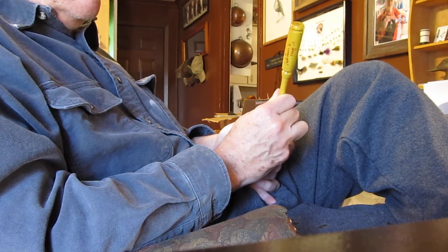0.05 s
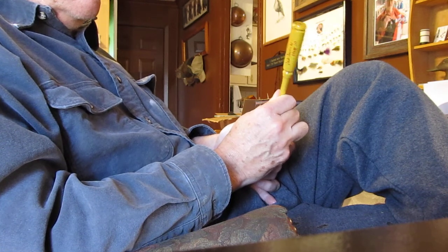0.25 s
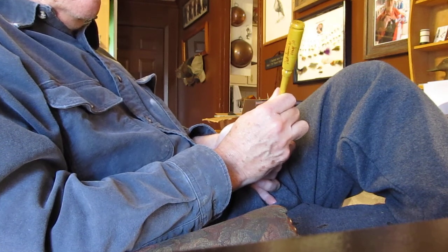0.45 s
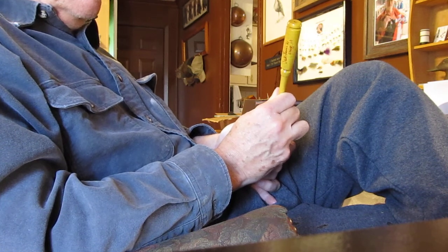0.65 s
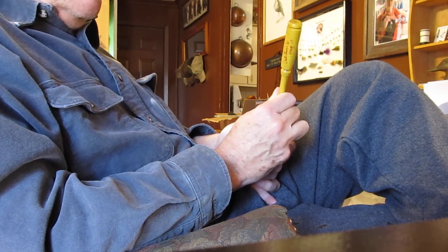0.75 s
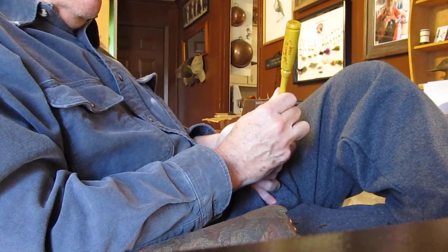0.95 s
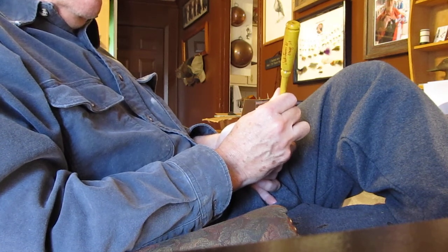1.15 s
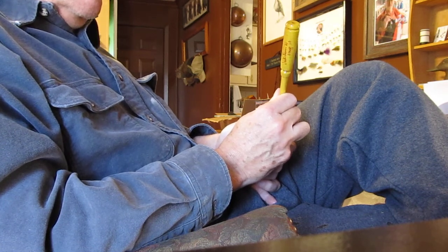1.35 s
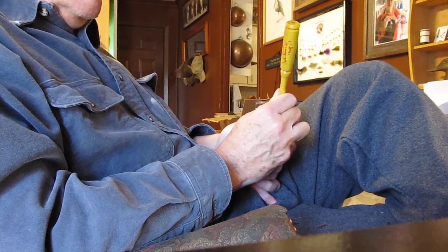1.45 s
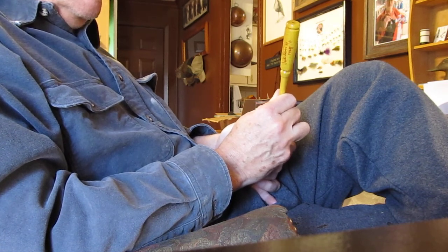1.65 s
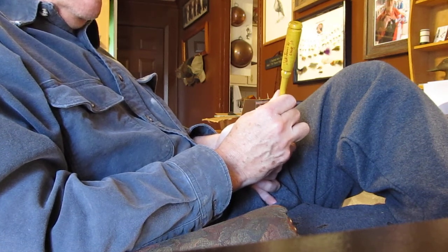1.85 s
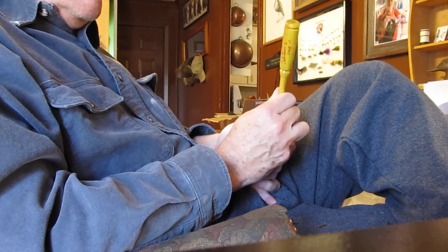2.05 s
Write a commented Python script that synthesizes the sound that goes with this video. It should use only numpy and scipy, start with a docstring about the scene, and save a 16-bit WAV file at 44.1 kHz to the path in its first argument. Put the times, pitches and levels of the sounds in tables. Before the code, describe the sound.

A friction turkey call gives one sharp cluck, then a stuttering, swelling purr in a quiet room.

```python
"""Heard first are the dying, fluttering partials of an earlier note over low rumble, hum and hiss.
Then a striker is worked on a friction pot call in a small quiet room: a light tap, one sharp cluck,
another tap, and a stuttering purr. The tip sticks and slips on the plate, giving harmonics with rasp;
the taps sound decaying pot modes, the hollow pot rings near 1 kHz and the room answers briefly."""
import sys
import numpy as np
from scipy import signal
from scipy.fft import rfft, irfft, next_fast_len
from scipy.io import wavfile
from scipy.ndimage import map_coordinates

SR = 44100
rng = np.random.default_rng(int(sys.argv[2]) if len(sys.argv) > 2 else 0)


def transcribe(u):
    """Save the signal u as a 16-bit wav file named by the first command-line argument.

    u: samples, shape (n,) or (channels, n), limited to [-1, 1]; the rate is SR.
    q: integer samples, one column per channel.
    """
    v = np.clip(np.atleast_2d(u).T, -1, 1)
    q = np.round(v * 32767).astype(np.int16)
    wavfile.write(sys.argv[1], SR, q)


N = 94815
T = np.arange(N) / SR  # time, s

# Background level against time: [t/s, level/dB]
BACKGROUND_LEVEL = [(0.0, -58), (0.29, -57.5), (0.65, -58.5), (1.76, -53), (2.15, -51)]
# Relative spectrum of the background noise: [f/Hz, level/dB]
BACKGROUND_SPECTRUM = [(15, -60), (25, -26), (48, -10.5), (86, -9.5), (110, -9), (221, 0), (368, -10),
                       (457, -6.5), (762, -15.5), (919, -16.5), (997, -16.5), (1080, -15.5), (1200, -17),
                       (2060, -17), (5730, -23), (7300, -34), (10100, -29.5), (13200, -30.5),
                       (15500, -57.5)]
# Likeness of the left and right background noise: [f/Hz, correlation (no unit)]
BACKGROUND_LIKENESS = [(60, 0.91), (180, 0.86), (550, 0.3), (1650, 0.31), (4970, 0.02), (15000, 0.32)]
# Steady hum tones, relative to the background level: [f/Hz, level/dB]
HUM_TONES = [(59, -18), (120, -14.5), (935, -16.5), (2094, -21.5)]
BACKGROUND_NOISE_DB, BACKGROUND_PAN_DB = 1.5, -.9  # pan is left minus right

# Partials of the earlier note, levels at the start before flutter: [f/Hz, level/dB]
EARLIER_PARTIALS = [(1394, -55), (2121, -59), (2848, -72), (3537, -78), (4269, -77)]
AFTER_T60_S = .33
AFTER_FLUTTER_RATE, AFTER_FLUTTER_DB = 70, 5.5  # random knots per second; depth

# Decay time of the diffuse room tail: [f/Hz, t60/s]
ROOM_DECAY = [(300, 0.2), (900, 0.36), (1450, .36), (2200, 0.42), (4500, 0.17), (12000, 0.17)]
# Colour of everything the room returns: [f/Hz, level/dB]
ROOM_COLOURING = [(500, -10.5), (790, -3), (900, 6.5), (1080, -1), (1500, -4), (2200, 1.5), (3000, 2),
                  (4400, 4), (7000, 0.5), (12000, -2)]
# Distinct wall echoes, before the room colour: [delay t/s, level/dB]
WALL_ECHOES = [(0.028, -16.5), (0.048, -24), (.078, -27.5)]
TAIL_DB, TAIL_BUILD_S = -14, 0.003

# Modes of the damped pot, relative to the tap: [f/Hz, level/dB, t60/s]
POT_MODES = [(1076, -2, .02), (1230, -5, 0.031), (1750, -13.5, .009)]
CAVITY_HZ, CAVITY_T60_S, CAVITY_DB = 1030, 0.04, -17  # air in the pot
LOW_CUT_HZ, LOW_LEAK_DB = 704.5, -15.5  # the small pot radiates little below this

# Touches of the striker on the plate: [t/s, level/dB]
TAP_TIMES = [(0.129, -26.5), (1.254, -30.5)]
TAP_RISE_S = .0009

# Skips of the tip: [middle t/s, length/s, level/dB, pitch f/Hz at the middle, overtones level/dB]
SKIP_ROWS = [(1.394, 0.038, -47.5, 755, 1.5), (1.428, 0.017, -43, 771, 6.5), (1.45, 0.022, -39, 798.7, -5),
             (1.484, 0.022, -36.5, 811.6, -1), (1.502, .014, -38.5, 867, -24), (1.532, 0.04, -34, 845, -13),
             (1.586, 0.024, -36, 808, -1.5), (1.605, 0.018, -38, 866, -29), (1.68, 0.013, -33.5, 867, -14),
             (1.701, .024, -28.5, 804, 0.5), (1.74, .014, -26, 819.6, -2), (1.750, 0.0075, -29, 888, -24.5),
             (1.78, .010, -25, 842, -4), (1.792, .018, -26.5, 857, -7.5), (1.819, 0.016, -24, 797, 7),
             (1.834, .012, -30, 852, -1.5), (1.862, .014, -20.5, 841, -1.5)]
# Relative harmonics of the purr at full pressure, first upward: [level/dB]
PURR_HARMONICS = [0, 0, -7, -23, -33, -32, -39, -40, -45, -45, -47]
# Relative spectrum of the purr's rasp: [f/Hz, level/dB]
PURR_RASP_SPECTRUM = [(450, -53.5), (660, -52), (790, -12.5), (1000, 4), (1200, -8.5), (1450, -9.5),
                      (1800, -19), (2150, -19.5), (2500, -46), (2900, -43.5), (4500, -37.5), (8500, -50),
                      (15500, -49.5)]
# Relative spectrum of the sharp edge of each slip under firm pressure: [f/Hz, level/dB]
GRIT_SPECTRUM = [(2600, -29), (3400, -0.5), (3750, -9.5), (4300, 1.5), (4800, 2.5), (5300, -17),
                 (6000, 4.5), (7500, -10.5), (8700, -11.5), (10000, -10), (15500, -28)]
# Relative spectrum of the scrape before the skips: [f/Hz, level/dB]
SCRAPE_SPECTRUM = [(600, -40.5), (1000, -5), (1150, -15.5), (1330, -4), (1500, -8.5), (1750, -29),
                   (4000, -44), (12000, -60)]
PURR_RASP_DB, GRIT_DB, PURR_JITTER = -3.5, -33.5, 0.0088
SKIP_SHAPE = 2.42  # exponent of the swell
PRESS_BRIGHTENS, PRESS_SAG = 1, .08  # overtone exponent; share by which pressure lowers the pitch
RISE_PER_S = 1.5  # share by which the pitch climbs as a skip speeds up
FULL_SKIP_DB, SOFT_DULLS = -34, 1  # below this level, dB lost by harmonics 3 and up per dB
SCRAPE_S, SCRAPE_LENGTH_S, SCRAPE_DB = 1.373, 0.021, -39.5  # middle, half-height width, level

# Stick-slip rate of the cluck before jitter: [t/s, f/Hz]
CLUCK_RATE = [(.205, 990), (.214, 1015), (.2175, 965), (.2195, 738), (.223, 729), (.237, 728), (.242, 712),
              (.247, 675), (.252, 635)]
# Strength of the cluck: [t/s, level/dB]
CLUCK_STRENGTH = [(.203, -56.5), (.21, -22.5), (.2145, -13), (.222, -11), (.232, -13), (.241, -20),
                  (.247, -17.5), (.251, -23), (.259, -46)]
# Relative spectrum of the cluck's rasp: [f/Hz, level/dB]
CLUCK_RASP_SPECTRUM = [(450, -46), (640, -45), (760, -12.5), (1000, -6.5), (1150, 1), (1330, 0),
                       (1750, -11), (2050, -0.5), (2800, -16.5), (3900, -23.5), (4400, -14), (5200, -29.5),
                       (6300, -20.5), (8500, -32.5), (11500, -28), (15500, -45.5)]
# Radiation of the plate for harmonics of the cluck: [f/Hz, level/dB]
PLATE_RADIATION = [(620, -32), (730, -17), (1000, 2), (1280, 3), (1460, 1), (1750, -18.5), (2000, -5.5),
                   (2190, -10.5), (2550, -20), (2920, -21.5), (3300, -37), (3650, -31), (4000, -40.5),
                   (4400, -15.5), (4750, -40), (5900, -42), (7500, -45.5)]
BITE_S, BITE_RISE_S = .2188, 0.0017  # the light skid turns into a full bite
CLUCK_RASP_DB, CLUCK_JITTER, SKID_OVERTONES_DB = -16, 0.014, -10.5

PAN_DB, RIGHT_LAG_S = -2.1, -0.00003  # left minus right; a negative lag means the right leads
TOP_HZ = 15700


def amp(db):
    """Decibel law: level to amplitude ratio."""
    return 10 ** (np.asarray(db) / 20)


def unit(x):
    """Normalisation to an rms of 1."""
    return x / np.sqrt(np.mean(x ** 2) + 1e-20)


def along(points, hz):
    """Interpolation of (f/Hz, value) points on a logarithmic frequency axis."""
    f, v = np.transpose(points)
    return np.interp(np.log(hz + 1), np.log(f + 1), v)


def curve(rows):
    """Linear interpolation of (t/s, value) points, one value per sample."""
    return np.interp(T, *np.transpose(rows))


def wobble(rate):
    """Smooth random fluctuation: a spline through `rate` random knots per second."""
    knots = rng.standard_normal(int(N * rate / SR) + 4)
    return map_coordinates(knots, [T * rate])


def filtered(x, response):
    """Linear filtering: the spectrum is multiplied by a response of frequency."""
    m = next_fast_len(N + SR // 2)
    spectrum = rfft(x, m) * response(np.fft.rfftfreq(m, 1 / SR))
    return irfft(spectrum, m)[..., :N]


def noise(spectrum):
    """Coloured noise: white noise through a spectral weighting, at rms 1."""
    return unit(filtered(rng.standard_normal(N), lambda hz: amp(along(spectrum, hz))))


def sine(db, phase):
    """Pure tone whose rms is set by a level in dB."""
    return np.sqrt(2) * amp(db) * np.sin(phase)


def fade(t, t60):
    """Exponential decay, falling 60 dB in t60."""
    return amp(-60 * t / t60)


def background():
    """Partial coherence: shared and opposed noise make rumble and hiss; slowly drifting phases make hum."""
    def turn(hz):
        return np.arccos(np.clip(along(BACKGROUND_LIKENESS, hz), -1, 1)) / 2

    def shares(hz):
        return np.array([np.cos(turn(hz)), np.sin(turn(hz))])

    sources = np.array([noise(BACKGROUND_SPECTRUM), noise(BACKGROUND_SPECTRUM)])
    mid, side = filtered(sources, shares)
    hiss = amp(BACKGROUND_NOISE_DB) * np.array([mid + side, mid - side])
    hum = sum(sine(db, 2 * np.pi * hz * T + .3 * wobble(2)) for hz, db in HUM_TONES)
    return amp(curve(BACKGROUND_LEVEL)) * (hiss + hum)


def aftersound():
    """Reverberant decay: partials of an earlier note flutter in level and phase as they die away."""
    total = 0
    for hz, db in EARLIER_PARTIALS:
        level = db + AFTER_FLUTTER_DB * wobble(AFTER_FLUTTER_RATE)
        phase = 2 * np.pi * hz * T + .6 * wobble(AFTER_FLUTTER_RATE)
        total = total + sine(level, phase)
    return fade(T, AFTER_T60_S) * total


def room(x):
    """Reverberation: wall echoes and a short diffuse tail that differs at each microphone."""
    hz, t, z = signal.stft(rng.standard_normal((2, SR // 2)), SR, nperseg=256)
    envelope = fade(t, along(ROOM_DECAY, hz)[:, None]) * (1 - np.exp(-t / TAIL_BUILD_S))
    tail = signal.istft(z * envelope, SR, nperseg=256)[1]
    tail = tail + 0.098 * tail[::-1]  # the two sides share a little
    diffuse = signal.fftconvolve(x[None], tail / np.linalg.norm(tail[0]), axes=1)[:, :N]

    def reflections(f):
        return sum(amp(db) * np.exp(-2j * np.pi * f * s) for s, db in WALL_ECHOES)

    echoes = filtered(x, reflections)
    return filtered(amp(TAIL_DB) * diffuse + echoes, lambda f: amp(along(ROOM_COLOURING, f)))


def pot(x):
    """Cavity resonance: the hollow pot rings on after each stroke and radiates little bass."""
    width = np.log(1000) / (np.pi * CAVITY_T60_S)  # bandwidth, Hz

    def ring(f):
        return 1j * f * width / (CAVITY_HZ ** 2 - f * f + 1j * f * width)

    def low_cut(f):
        return amp(LOW_LEAK_DB * (.5 - .5 * np.tanh((f - LOW_CUT_HZ) / 40)))

    return filtered(x, lambda f: low_cut(f) * (1 + amp(CAVITY_DB) * ring(f)))


def taps():
    """Modal excitation: setting the striker down rings the damped pot."""
    out = np.zeros(N)
    for s, db in TAP_TIMES:
        t = np.maximum(T - s, 0)
        onset = 1 - np.exp(-(t / TAP_RISE_S) ** 2)
        modes = sum(amp(level) * fade(t, t60) * np.sin(2 * np.pi * hz * t)
                    for hz, level, t60 in POT_MODES)
        out += amp(db) * onset * modes
    return out


def purr():
    """Pressure-controlled stick-slip: after a scrape, each skip swells with tone, rasp and grit."""
    swell = .5 ** ((2 * (T - SCRAPE_S) / SCRAPE_LENGTH_S) ** 2)
    out = amp(SCRAPE_DB) * noise(SCRAPE_SPECTRUM) * swell
    rasp = amp(PURR_RASP_DB) * noise(PURR_RASP_SPECTRUM)
    grit = amp(GRIT_DB) * noise(GRIT_SPECTRUM)
    flutter = amp(0.53 * wobble(300))
    unevenness = 1 + PURR_JITTER * wobble(500)
    for s, length, db, hz, bright_db in SKIP_ROWS:
        near = np.abs(T - s) < 2 * length
        t = T[near] - s
        press = .5 ** (np.abs(2 * t / length) ** SKIP_SHAPE)  # half at +/- length / 2
        rate = hz * (1 + PRESS_SAG * (1 - press) + RISE_PER_S * t) * unevenness[near]
        phase = 2 * np.pi * np.cumsum(rate) / SR
        first, second, *high = [sine(level, k * phase + rng.uniform(0, 2 * np.pi))
                                for k, level in enumerate(PURR_HARMONICS, 1)]
        softness_db = SOFT_DULLS * min(db - FULL_SKIP_DB, 0)
        edge = grit[near] * (1 + np.cos(phase))  # grit peaks once per slip
        overtones = second + amp(softness_db) * sum(high) + edge
        tone = first + amp(bright_db) * press ** PRESS_BRIGHTENS * overtones
        grip = 1 - 0.46 * press * min(amp(bright_db), 1)  # a firm grip rasps less
        out[near] += amp(db) * (press * tone * flutter[near] + press ** 0.54 * grip * rasp[near])
    return out


def slip_phase(hz, jitter):
    """Phase as the integral of frequency, for a slightly uneven stick-slip cycle."""
    return 2 * np.pi * np.cumsum(hz * (1 + jitter * wobble(500))) / SR


def harmonics(phase, hz, flutter_db, count):
    """Fourier series of the slip cycle: each harmonic has the plate's weight and its own flutter."""
    rows = []
    for k in range(1, count + 1):
        level = along(PLATE_RADIATION, k * hz) + flutter_db * wobble(251)
        rows.append(sine(level, k * phase + rng.uniform(0, 2 * np.pi)))
    return rows


def cluck():
    """Stick-slip regime change: a skid bites into a lower, richer vibration and sags as it lets go."""
    hz = curve(CLUCK_RATE)
    phase = slip_phase(hz, CLUCK_JITTER)
    bite = .5 + .5 * np.tanh((T - BITE_S) / BITE_RISE_S)
    low, *high = harmonics(phase, hz, flutter_db=1.1, count=10)
    tone = low + amp(SKID_OVERTONES_DB * (1 - bite)) * sum(high)
    rasp = amp(CLUCK_RASP_DB) * noise(CLUCK_RASP_SPECTRUM)
    rasp = rasp * (.5 + 0.87 * bite) * (1 + 0.52 * np.cos(phase))  # pulses with the slips
    sounding = (T > CLUCK_STRENGTH[0][0]) * (T < CLUCK_STRENGTH[-1][0])
    return amp(curve(CLUCK_STRENGTH)) * sounding * (tone + rasp)


def scene():
    """Interaural level and time differences set the nearby call slightly to the right."""
    call = pot(cluck() + purr() + taps())
    sides = np.array([[.5], [-.5]])  # left, right
    direct = filtered(call, lambda hz: np.exp(2j * np.pi * hz * RIGHT_LAG_S * sides))
    foreground = amp(PAN_DB * sides) * (direct + room(call) + aftersound())
    return foreground + amp(BACKGROUND_PAN_DB * sides) * background()


def record(dry):
    """Band limitation: nothing is kept from the top frequency upward."""
    return filtered(dry, lambda hz: hz < TOP_HZ)


dry = scene()
out = record(dry)
transcribe(out)
```